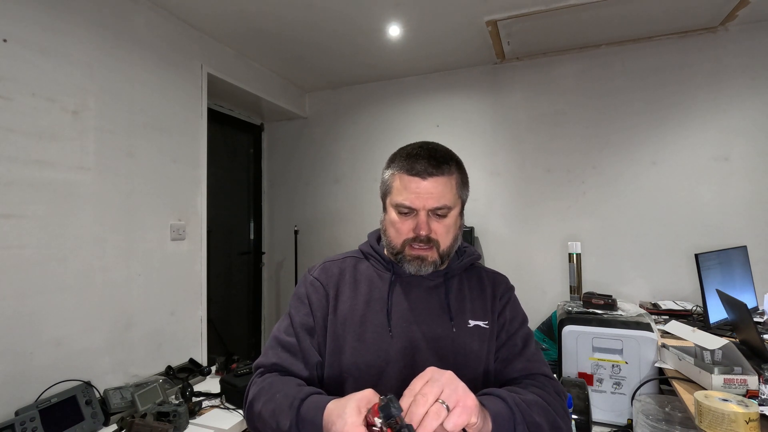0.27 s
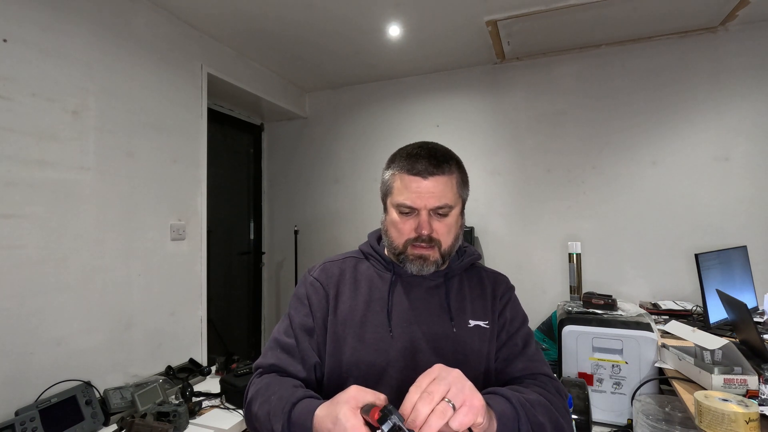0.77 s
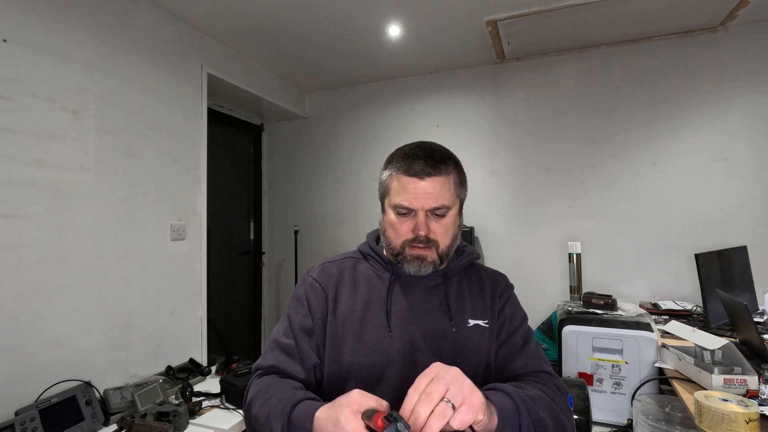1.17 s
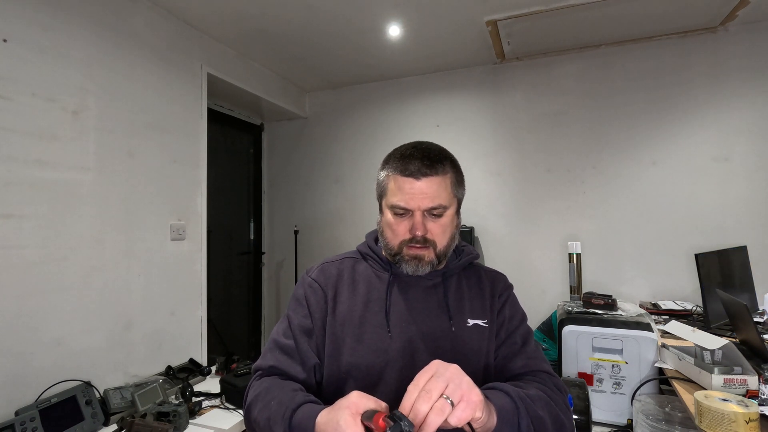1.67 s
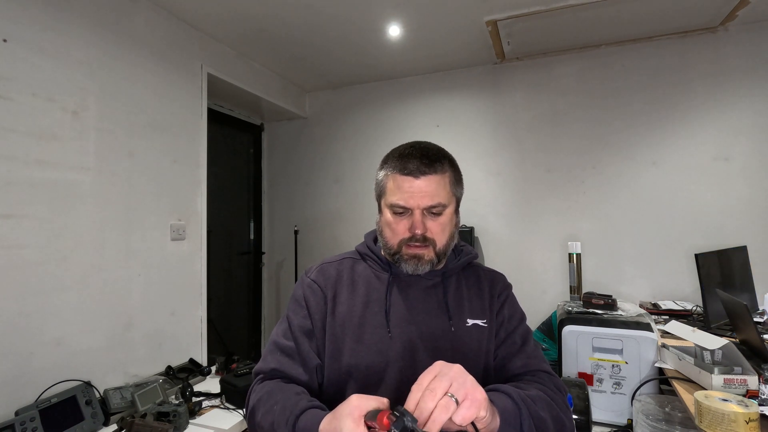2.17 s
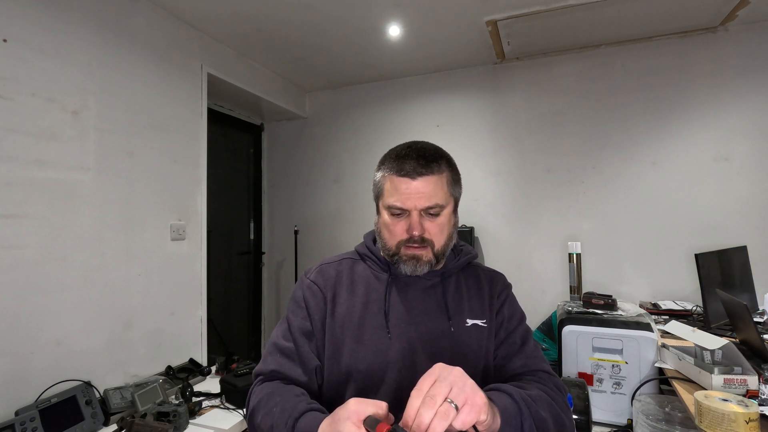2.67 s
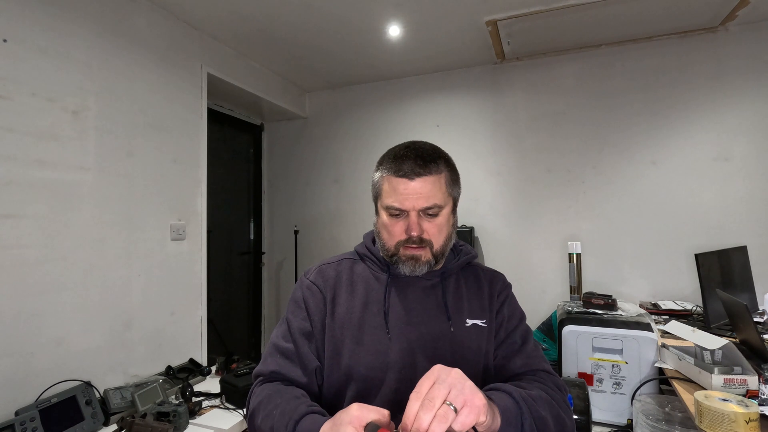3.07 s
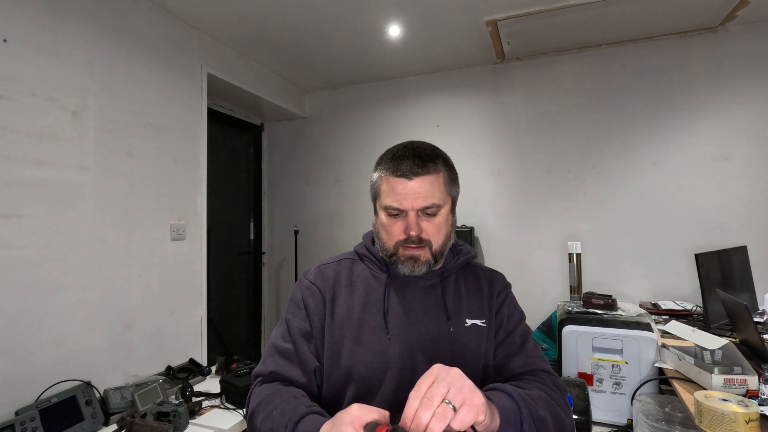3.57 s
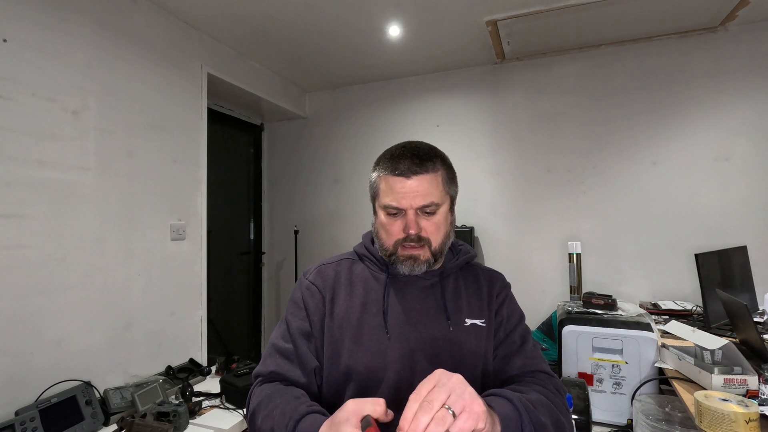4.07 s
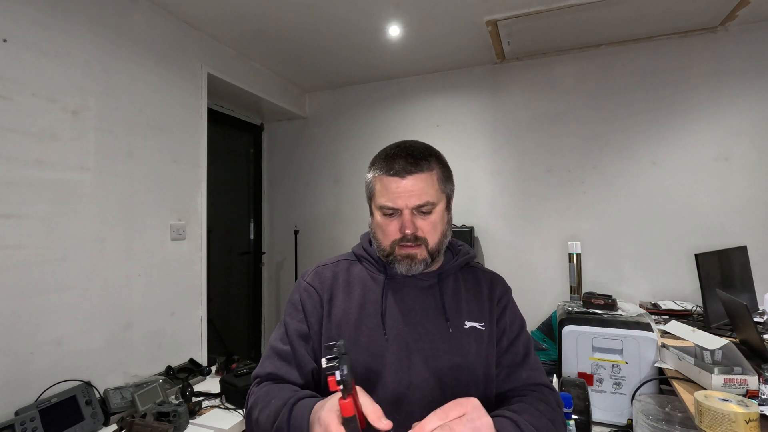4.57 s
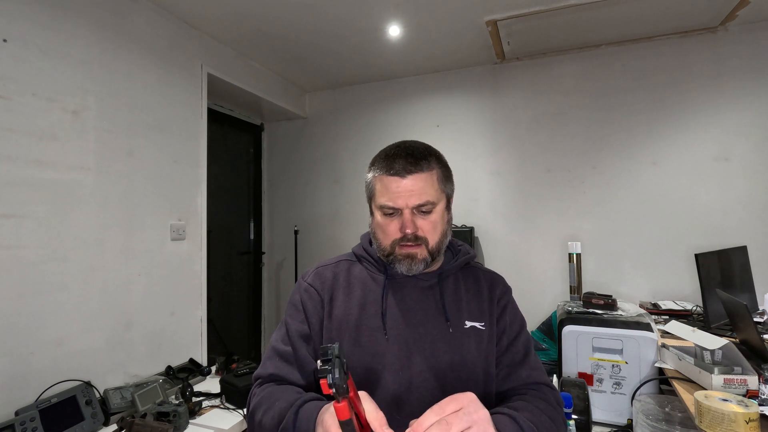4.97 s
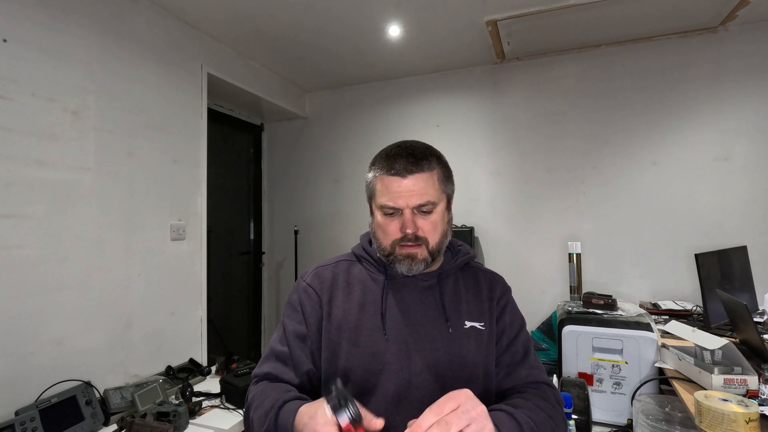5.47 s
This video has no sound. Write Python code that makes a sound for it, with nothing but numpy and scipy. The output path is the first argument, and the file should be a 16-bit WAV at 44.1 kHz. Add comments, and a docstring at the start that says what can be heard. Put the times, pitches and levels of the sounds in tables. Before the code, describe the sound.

A hand crimping tool is worked close to a stereo microphone in a bare plastered workshop. Quick clusters of crisp steel clicks build to a hard snap, then pause; sparser clicks follow, then the loudest crack just after four seconds, with a dull bench knock. More handle clacks close the passage. Each click leaves a short bright room tail over quiet fan hush and faint low rumble.

```python
"""In a bare, plastered workshop, a ratchet crimping tool is worked at a bench before a stereo microphone.
Pawl, jaws and handles snap: each click is a bare crack plus fast-dying steel tones, echoed by the bench.
The room prolongs clicks with fading noise; a few dull knocks of tool on bench are lower dying tones.
Behind lie a fan-like hush of filtered noise, a low rumble of narrow wavering tones,
and electronics: one thin steady-pitched whine with regular, slowly fading ticks."""
import sys
import numpy as np
from scipy import signal
from scipy.io import wavfile

SR = 44100
rng = np.random.default_rng(int(sys.argv[2]) if len(sys.argv) > 2 else 0)


def pcm_store(signal):
    """Save signal as 16-bit PCM."""
    levels = np.round(np.clip(np.atleast_2d(signal), -1, 1) * 32767)
    wavfile.write(sys.argv[1], SR, levels.astype(np.int16).T)


N = 253134   # length in samples


def from_db(db):
    """Turn decibels into a gain."""
    return 10 ** (np.asarray(db) / 20)


def rms_one(x):
    """Scale a sound to an rms of 1."""
    return x / np.sqrt(np.mean(x ** 2) + 1e-20)


def at_hz(points, hz):
    """Read a table between its points, with pitch on a log scale."""
    table_hz, values = np.transpose(points)
    return np.interp(np.log(hz), np.log(table_hz), values)


def panned(x, lean_db):
    """Share a sound between left and right; a positive lean makes the left louder."""
    return x * from_db([[lean_db / 2], [-lean_db / 2]])


def add(track, sound, s):
    """Mix a short sound into a track at time s."""
    i = int(round(s * SR))
    track[..., i:i + sound.shape[-1]] += sound[..., :track.shape[-1] - i]


def drift(rate):
    """Slow random wandering: `rate` random points per second, joined by straight lines."""
    points = rng.standard_normal(int(N / SR * rate) + 2)
    return np.interp(np.arange(N) / SR * rate, np.arange(len(points)), points)


def bands(low_hz, step):
    """Band-pass filters, each `step` octaves wide, with their centres."""
    edges = low_hz * 2 ** np.arange(0, np.log2(19000 / low_hz), step)
    filters = []
    for low, high in zip(edges, edges[1:]):
        sos = signal.butter(2, [low, high], "band", fs=SR, output="sos")
        filters.append((np.sqrt(low * high), sos))
    return filters


CONTACT_S = .00025   # time scale of the swell


def struck(modes, extra_db, size=4410):
    """A struck thing rings in dying sine tones; contact takes a moment, so they swell in."""
    hz, level_db, t60 = np.transpose(modes)[:, :, None]
    chance = rng.standard_normal((3, len(modes), 1))
    t = np.arange(size) / SR
    polarity = np.sign(chance[0])
    tone_db = level_db + np.reshape(extra_db, (-1, 1)) + 2.0 * chance[1] - 60 * t / t60
    shifted_hz = hz * (1 + 0.0097 * chance[2])
    tones = polarity * from_db(tone_db) * np.sin(2 * np.pi * shifted_hz * t)
    return (1 - np.exp(-(t / CONTACT_S) ** 2)) * np.sum(tones, axis=0)


# tone colour of the hush: (f/Hz, noise density/dB relative)
HUSH = [(79, -30.5), (135, -3), (200, -3.5), (266, -7.5), (413, -22), (558, -19), (866, -21.5),
        (1020, -14.5), (1320, -21.5), (2080, -32), (2990, -33), (5000, -34), (7490, -30), (10500, -39),
        (12100, -30), (16000, -55.5)]
# stereo width of the hush: (f/Hz, side against mid level/dB)
HUSH_WIDTH = [(60, -26), (130, -6.5), (290, 0.5), (640, -1), (1410, -2), (3100, 1.5), (6820, -14),
              (15000, 1)]
# balance of the hush: (f/Hz, left minus right level/dB)
HUSH_LEAN = [(60, -2), (130, -4), (290, -12.5), (640, -5), (1410, -1), (3100, -0.5), (6820, 2.5),
             (15000, 3.5)]
HUSH_DB = -66   # rms over both channels


def hush(patchy_db):
    """Air and machine noise in third-octave bands, each with its own width, lean and flicker."""
    white, out = rng.standard_normal((2, 2, N + SR)), 0
    for k, (hz, sos) in enumerate(bands(88, 1 / 3)):
        # neighbouring bands use different noise; the first second lets the filter settle
        mid, side = signal.sosfilt(sos, white[k % 2])[:, SR:]
        side = side * from_db(at_hz(HUSH_WIDTH, hz))
        flicker_db = patchy_db * (1 + 300 / hz) * drift(6)   # the bass is lumpier
        gain = from_db(at_hz(HUSH, hz) + flicker_db)
        out = out + gain * panned(np.array([mid + side, mid - side]), at_hz(HUSH_LEAN, hz))
    return from_db(HUSH_DB) * rms_one(out)


# level of the low rumble over time, before each mode takes its share: (t/s, level/dB)
RUMBLE = [(0.0, -80), (0.17, -59.5), (0.3, -59), (0.38, -78.5), (0.61, -54.5), (0.73, -66), (1.82, -63.5),
          (2.13, -73), (2.16, -57.5), (2.57, -80), (2.68, -67.5), (3.28, -56.5), (3.32, -71.5),
          (3.49, -60.5), (3.53, -71.5), (3.93, -58.5), (4.01, -72), (4.68, -62.5), (4.78, -72),
          (4.95, -58.5), (5.04, -69.5), (5.37, -77), (5.43, -62), (5.74, -72.5)]
# standing waves of the building: (f/Hz, width/Hz, level/dB against the rumble, share of its swing)
BUILDING_MODES = [(30.6, 4.9, -1.5, .3), (56, 4.8, -1, 1.3), (100.2, 7, -6, 1.3)]
LUMPY_DB, LUMPS_PER_S = 3.5, 12   # size and pace of random swelling


def rumble():
    """Distant low noise excites standing waves of the building, heard as narrow wavering tones."""
    s, level_db = np.transpose(RUMBLE)
    mean_db = level_db.mean()
    swing_db = np.interp(np.arange(N) / SR, s, level_db - mean_db)
    out, together = np.zeros(N), drift(LUMPS_PER_S)
    for hz, width_hz, mode_db, share in BUILDING_MODES:
        peak = signal.iirpeak(hz, hz / width_hz, SR)
        noise = signal.lfilter(*peak, rng.standard_normal(N + SR))[SR:]
        # dividing by its own loudness evens out the noise
        even = noise / (np.abs(signal.hilbert(noise)) + .5 * np.std(noise))
        # half of the swelling is shared by all modes
        lumps = from_db(LUMPY_DB * (together + drift(LUMPS_PER_S)) / np.sqrt(2))
        out += rms_one(even * lumps) * from_db(mean_db + mode_db + share * swing_db)
    return out


WHINE_HZ, WHINE_DB = 12430, -100   # level before drift and panning
TICK_HZ, TICK_DB, TICK_T60_S = (11800, 12150), -72, 0.0081   # level before the changes below
TICK_START_S, TICK_STEP_S, TICK_FADE = .022, 1 / 30, 1.2   # the fade is in dB per s


def electronics():
    """A thin whine is one sine; ticks are two dying tones on a clock, every second one stronger on average."""
    whine = np.sin(2 * np.pi * WHINE_HZ * np.arange(N) / SR)
    out = from_db(WHINE_DB + 3.0 * drift(8.7)) * whine
    pair = [(hz, TICK_DB, TICK_T60_S) for hz in TICK_HZ]
    soft_start = 1 - np.exp(-np.arange(800) / 60.0)
    for k, s in enumerate(np.arange(TICK_START_S, N / SR, TICK_STEP_S)):
        tick_db = 4.5 * (k % 2) - TICK_FADE * s + rng.normal(0, 3.3)
        add(out, struck(pair, [tick_db] * 2, size=800) * soft_start, s)
    return panned(out[None], 6.2)


# tone colour of an average click: (f/Hz, level/dB relative)
CLICK_COLOUR = [(1400, -25), (2300, -21), (3700, -16), (5400, -13.5), (7400, -16), (11000, -21)]
PIVOT_HZ = 4000


def colour(hz, bright_db, narrow_db):
    """Tilt and narrow the average click around the pivot pitch."""
    octaves = np.log2(np.asarray(hz) / PIVOT_HZ)
    return at_hz(CLICK_COLOUR, hz) + bright_db * octaves - narrow_db * octaves ** 2


# middles of the pitch zones of a crack: (f/Hz)
ZONES_HZ = [1400, 2300, 3700, 5400, 7400, 11000]


def cracks(size=4410):
    """The bare impact in each pitch zone: one impulse through a band-pass filter."""
    impulse, out = signal.unit_impulse(size), []
    for k, hz in enumerate(ZONES_HZ):
        sos = signal.butter(2, [hz / 1.25, hz * 1.25], "band", fs=SR, output="sos")
        # low zones are narrower in Hz, so lift them; neighbours have opposite sign
        out.append(signal.sosfilt(sos, impulse) * np.sqrt(ZONES_HZ[-1] / hz) * (-1) ** k)
    return np.array(out)


# clicks: (t/s, reference level/dB, brightness/dB per octave, narrowness/dB per octave squared,
# loose part f/Hz, its level/dB against the reference, room share level/dB, left minus right level/dB)
CLICKS = [(0.087, -59.5, 1, -3, 5800, -15, -3.5, 3), (0.1667, -59, 6, 3, 5800, -19, 5.5, 4),
          (0.187, -37.5, -3.5, -0.5, 2770, -10, -13.5, -2.5), (0.2212, -38.5, 10, 8, 4220, -17, -10, 2),
          (0.269, -41.5, 3, 3, 4360, -14, -10, 6), (0.3085, -30.5, 4.5, 0, 7650, -6, -11.5, 5),
          (0.3143, -32, -4.5, 6, 7400, -14, -10, -5), (0.3319, -35.5, -11, 10, 3580, -21, 0.5, -2),
          (0.341, -43.5, 3.5, -4.5, 7200, -18, -4.5, 5), (0.5672, -34, 3, -3, 7000, -25, -5, 4),
          (0.595, -39.5, 2, -2, 3220, -23, -2.5, 2), (0.6584, -31.5, -3.5, 2, 2850, -26, -5.5, 4),
          (0.671, -34.5, -9.5, 6, 2950, -28, -6.5, -9), (0.6841, -39, -10, 2.5, 2010, -5.5, -14, 6),
          (0.7158, -40, -3, -3.5, 1860, -19.5, -1, 3), (0.7227, -37.5, -2, 5, 1850, -20, -5, 5),
          (0.7395, -14.5, 2, 6.5, 5970, -11, -13.5, -4), (0.746, -18.5, 1.5, 0, 3300, -7.5, -14, 6),
          (1.3921, -62, -4.5, -2, 2120, -8, -15.5, 7), (1.5989, -65, 5.5, -4, 7550, -5, -1, 4),
          (1.8406, -36, 4.5, 2.5, 2060, -13.5, -12, 5.5), (1.8444, -40, -4.5, 4, 5230, -14, -0.5, 3),
          (1.975, -44, 1, -0.5, 3860, -20, -9, 3), (2.0627, -39, -0.5, 3, 3900, -24, -3, -3),
          (2.0808, -43.5, 4, 1, 2800, -10, -5, 7), (2.2717, -51.5, 3, -2.5, 6840, -16, -6, 3),
          (2.2887, -56.5, 2, -4, 5870, -27, 2, -13), (2.3065, -33, 1.5, -0.5, 6200, -32, -1.5, -7),
          (2.3123, -30.5, 4.5, -2, 7650, -24, -18, 6), (2.3383, -29, -5.5, 4, 4210, -12, -8, 6),
          (2.3648, -22.5, -7, 4.5, 2960, -22, -8.5, 4), (2.389, -22.5, -0.5, 2, 5350, -4, -12, 3.5),
          (2.579, -34.5, 2.5, -3, 2090, -24, -11, 4.5), (2.857, -54.5, -3, 0, 3410, -22.5, -6, 0),
          (3.105, -62, 3, 0, 8040, -13, 6.5, 0), (3.1464, -35, 1.5, 0.5, 2540, -14.5, -9, 2.5),
          (3.1989, -17, 0.5, -2, 2620, -10.5, -12, 3.5), (3.2013, -36, -5, 7, 1890, 3, -9.5, 5),
          (3.393, -45.5, 5.5, 0, 5470, -0.5, -14, -4), (3.6593, -60.5, 7, -0.5, 6290, -5.5, -7, -1),
          (4.0484, -49, 2.5, -5, 3850, -6.5, -9, 1.5), (4.0712, -40.5, -7, 3, 2250, -24.5, 2, -2),
          (4.083, -34.5, 1.5, 2.5, 6460, -6, -9.5, 18), (4.102, -14.5, 3, 1, 4020, -14, -9, 0),
          (4.1117, -9, 4, -1, 7630, -9.5, -12.5, 4.5), (4.1128, -29, 1, -5, 2064, 2.5, -10.5, 3),
          (4.3391, -39.5, -7, -3.5, 1540, -14.5, -7, .5), (4.407, -43.5, -0.5, -4, 3750, -13, -9, 2.5),
          (4.4622, -31, -8.5, 5, 3930, -23, -9.5, 3.5), (4.4897, -26.5, -1.5, -1.5, 3960, -7, -14, -1),
          (4.4927, -22, 1, 3, 5930, -13, -12, 1.5), (4.5338, -21, 0.5, 0.5, 3515, -16, -10.5, 4),
          (4.5424, -22.5, 2.5, 3.5, 5090, -7.5, -10.5, -3), (5.1614, -56.5, -4, -3.5, 2660, -10, -11.5, -2),
          (5.252, -41.5, -1, -2, 3070, -7.5, -10, -1.5), (5.506, -60, -9.5, -0.5, 1530, -27.5, 1.5, -11),
          (5.5603, -22, 5, -4, 6740, -35, -7.5, 3.5), (5.5885, -19, -1, 3.5, 5400, -15, -7, 8),
          (5.6284, -22.5, 0.5, -3.5, 3750, -12, -13, 4)]
# steel tones of the tool: (f/Hz, level/dB relative, time to fall 60 dB/s)
STEEL = [(1250, 0, .006), (1600, 0, .006), (1950, 3, .007), (2350, 2, .006), (2850, 2, .006),
         (3300, 4, .006), (3900, 3, .005), (4350, 3, .005), (5200, 2, .005), (5850, 3, .005),
         (6500, 3, .005), (7300, 4, .005), (8200, 1, .004), (9000, 0, .004), (9800, 0, .004),
         (10800, -2, .004), (12000, -3, .004)]
# reflections off the bench: (typical delay t/s, level/dB against the click)
BENCH_ECHOES = [(.0007, -3), (.0013, -5.5), (.0019, -5)]
# how long loose parts ring in what enters the room: (f/Hz, cycles until 60 dB down)
PART_CYCLES = [(1500, 11.5), (2050, 16.5), (2500, 10), (3300, 33.5), (3760, 43.5), (4300, 19), (5200, 14),
               (7300, 24)]
PART_T60_S = .009    # ring of the loose part in the direct sound
PART_ROOM_DB = 8.5   # the loose part radiates more to the walls than to the microphone
SNAP_DB, CRACK_DB = 10, 19   # boost of the crack: direct, and into the room before its share


def tool():
    """Each click is a crack, ringing steel and a loose part; returns direct sound and what enters the room."""
    near, into_room, zones = np.zeros((2, N)), np.zeros(N), cracks()
    steel_hz = np.array(STEEL)[:, 0]
    for s, ref_db, bright_db, narrow_db, part_hz, part_db, room_db, lean_db in CLICKS:
        steel = struck(STEEL, ref_db + colour(steel_hz, bright_db, narrow_db))
        loose_part = struck([(part_hz, part_db, PART_T60_S)], ref_db)
        crack = from_db(ref_db + colour(ZONES_HZ, bright_db, narrow_db)) @ zones
        click = panned((steel + loose_part + from_db(SNAP_DB) * crack)[None], lean_db)
        add(near, click, s)
        for delay, echo_db in BENCH_ECHOES:
            add(near, click * from_db(echo_db), s + delay * rng.uniform(0.92, 1.3))
        # summed over all directions the steel tones blur into a smooth crack
        part_t60 = at_hz(PART_CYCLES, part_hz) / part_hz
        room_part = struck([(part_hz, part_db + PART_ROOM_DB, part_t60)], ref_db)
        add(into_room, (crack * from_db(CRACK_DB) + room_part) * from_db(room_db), s)
    return near, into_room


# dying away of the room: (f/Hz, time to fall 60 dB/s)
ROOM_T60 = [(300, 0.4), (1320, 0.38), (3480, 0.33), (6500, 0.45), (12000, .26)]
# tone colour of the room: (f/Hz, level/dB relative)
ROOM_COLOUR = [(300, 0.5), (1200, 3.5), (2000, 3.5), (3500, 0.5), (7000, -2.5), (12000, -3)]
# stereo width of the room: (f/Hz, side against mid level/dB)
ROOM_SIDE = [(500, -6.5), (1650, -6), (5000, -10), (9000, -20.5), (13000, 2.5)]
ROOM_BUILD_S = .004   # time scale of the build-up


def room(x):
    """Dense reflections act like noise that builds up, then dies at its own pace in each band."""
    t = np.arange(int(.7 * SR)) / SR
    white, tail = rng.standard_normal((2, 2, len(t))), 0
    for k, (hz, sos) in enumerate(bands(143, 0.5076)):
        width = from_db([[0], [at_hz(ROOM_SIDE, hz)]])
        decay = from_db(at_hz(ROOM_COLOUR, hz) - 60 * t / at_hz(ROOM_T60, hz))
        tail = tail + width * signal.sosfilt(sos, white[k % 2]) * decay
    build_up = 1 - np.exp(-(t / ROOM_BUILD_S) ** 2)
    mid, side = tail * build_up * from_db(-19)
    return signal.fftconvolve(x[None], np.array([mid + side, mid - side]), axes=1)[:, :N]


# tool against bench: (t/s, reference level/dB)
KNOCKS = [(3.198, -53.5), (4.109, -50), (4.342, -47.5), (4.351, -48.5), (4.365, -49)]
# tones of the bench top: (f/Hz, level/dB relative, time to fall 60 dB/s)
BENCH = [(204, -3.5, 0.069), (255.4, 1.5, 0.072), (332, -4.5, 0.03), (450, -1.5, 0.031), (540, -0.5, .03),
         (696, -3.5, 0.015)]


def knocks():
    """Dull blows make the bench top ring in low, dying tones."""
    out = np.zeros(N)
    for s, ref_db in KNOCKS:
        add(out, struck(BENCH, ref_db - 8.5), s)   # lowered because several tones add up
    return out


def scene():
    """Mix the background, the tool, its bench and their room."""
    background = hush(patchy_db=.7) + panned(rumble()[None], -.8) + electronics()
    no_bass = signal.butter(3, 800, "high", fs=SR, output="sos")   # small parts radiate no bass
    near, into_room = [signal.sosfilt(no_bass, x) for x in tool()]
    thuds = knocks()
    return near + thuds + room(into_room + thuds * from_db(-10.0)) + background


PORT_HZ, PORT_WIDTH_HZ, PORT_GAIN = 7150, 710, 0.53   # the gain is added to the plain sound
ROLLOFF_HZ, CUTOFF_HZ = 11100, 16400


def record(dry):
    """The microphone port resonates in the treble and rolls off above; the very top is cut steeply."""
    port = signal.iirpeak(PORT_HZ, PORT_HZ / PORT_WIDTH_HZ, SR)
    x = dry + PORT_GAIN * signal.lfilter(*port, dry)
    x = signal.sosfilt(signal.butter(2, ROLLOFF_HZ, fs=SR, output="sos"), x)
    return signal.sosfilt(signal.cheby2(10, 50, CUTOFF_HZ, fs=SR, output="sos"), x)


dry = scene()
out = record(dry)
pcm_store(out)
```